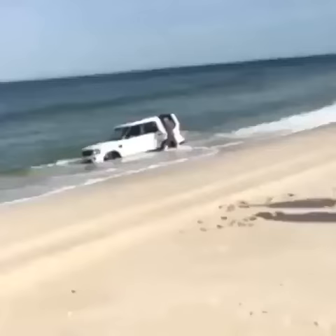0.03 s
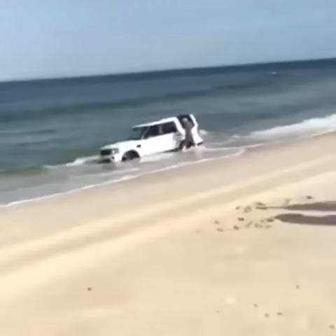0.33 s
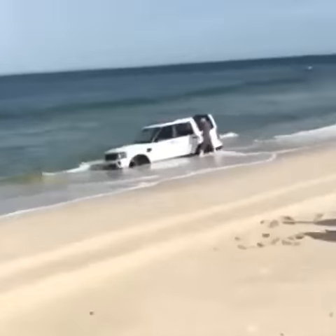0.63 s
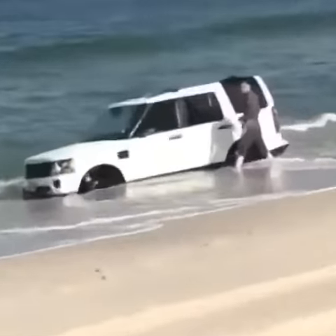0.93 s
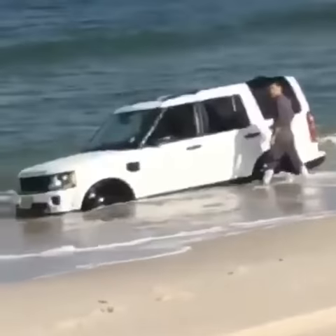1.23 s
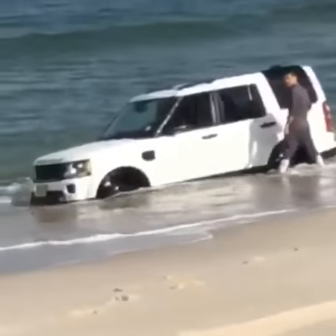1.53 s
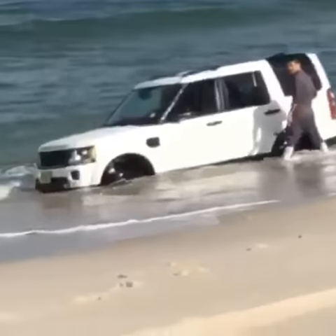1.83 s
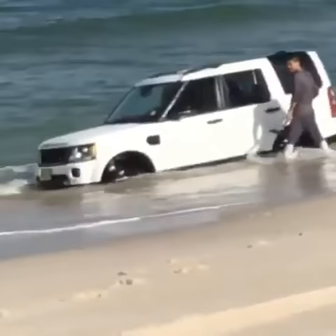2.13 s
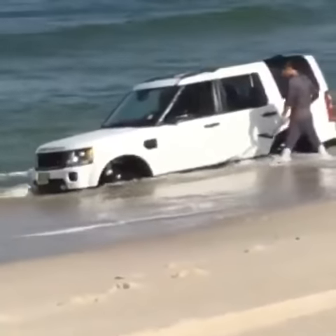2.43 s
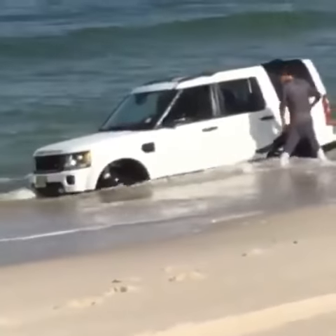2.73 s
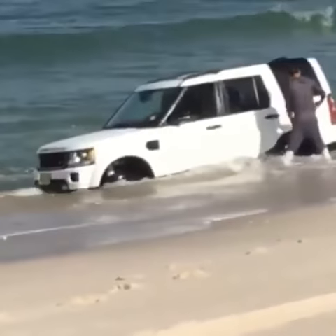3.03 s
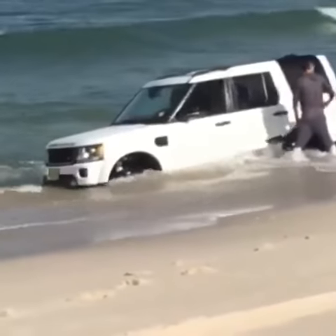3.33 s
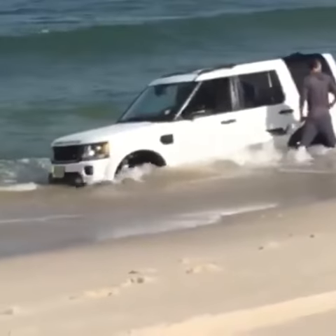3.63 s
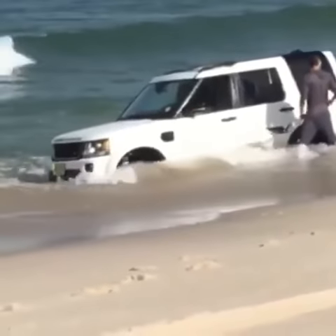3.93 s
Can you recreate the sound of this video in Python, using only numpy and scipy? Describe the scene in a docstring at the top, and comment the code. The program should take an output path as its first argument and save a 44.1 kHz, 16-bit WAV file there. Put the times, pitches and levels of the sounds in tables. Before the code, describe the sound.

Small surf washing up a sandy beach, with wind rumbling on the microphone.

```python
"""Small surf around a stuck car

After a short silence, wind rumbles and thumps on the microphone over a low drone and distant surf.
A wave builds up the sandy beach: tumbling water roars and bubbles, and foam fizzes as it spreads.
There is one small tick, and wavelets tip over in pattering splashes. Heard in mono from up the beach."""
import sys
import numpy as np
from scipy import signal
from scipy.fft import rfft, irfft
from scipy.io import wavfile
from scipy.ndimage import uniform_filter1d

SR = 44100
rng = np.random.default_rng(int(sys.argv[2]) if len(sys.argv) > 2 else 0)


def store_pcm(level_fs):
    """Save levels as 16-bit WAV."""
    pcm = np.round(np.clip(level_fs, -1, 1) * 32767).astype(np.int16)
    wavfile.write(sys.argv[1], SR, np.atleast_2d(pcm).T)


N = 176400


def undb(db):
    """Decibels to gain."""
    return 10 ** (np.asarray(db) / 20)


def unit(x):
    """Scale to rms 1."""
    return x / np.sqrt(np.mean(x ** 2) + 1e-20)


def curve(rows):
    """Join (time_s, value) rows by straight lines."""
    return np.interp(np.arange(N) / SR, *np.array(rows).T)


def wander(rate_hz):
    """Smoothed random steps, rate_hz of them a second; rms 1."""
    hold = max(int(SR / rate_hz), 2)
    steps = rng.standard_normal(1024)[np.arange(N) // hold % 1024]
    return unit(uniform_filter1d(uniform_filter1d(steps, hold), hold // 2))


def bin_hz():
    """Frequency of each spectral bin."""
    return np.maximum(np.arange(N // 2 + 1) * SR / N, 1)


def equalise(x, points):
    """Filter by (freq_hz, gain_db) points; rms 1."""
    hz, db = np.array(points).T
    gain = undb(np.interp(np.log(bin_hz()), np.log(hz), db))
    return unit(irfft(rfft(x) * gain, N))


def band(x, hz, octaves):
    """Keep a bell-shaped band; rms 1."""
    bell = np.exp(-.5 * (np.log2(bin_hz() / hz) / octaves) ** 2)
    return unit(irfft(rfft(x) * bell, N))


def swell(peak_s, half_length_s):
    """A bell-shaped fade in and out."""
    return np.exp(-((np.arange(N) / SR - peak_s) / half_length_s) ** 2)


def churn(rate_hz, own_db, shared_db, bands=24):
    """White noise whose bands flicker, partly alone and partly together; rms 1."""
    spectrum, out = rfft(rng.standard_normal(N)), 0
    place = np.interp(np.log(bin_hz()), np.log([400, 14000]), [0, bands - 1])
    for k in range(bands):
        strip = irfft(spectrum * np.maximum(1 - abs(place - k), 0), N)
        out = out + strip * undb(own_db * wander(rate_hz))
    return unit(out * undb(shared_db * wander(rate_hz / 2)))


# Tone of the wind rumble: freq_hz, gain_db
WIND_EQ = [(15, -23), (28, -46), (52, -8.5), (73, -5), (108, -1), (128, -3), (145, -10), (190, -12),
           (228, -15), (256, -8.5), (295, -16.5), (340, -23), (500, -36.5), (1500, -49)]
# Fader ride on the rumble: time_s, level_db
WIND_FADER = [(.26, -38.5), (.48, -38.5), (.56, -36), (1.3, -36), (1.5, -35.8), (1.9, -35.9), (2.25, -35),
              (2.7, -36.5), (3.4, -35.5), (4, -35.5)]


def wind(buffet_db=1, buffet_hz=22):
    """Wind buffets the microphone with a hollow, unsteady rumble."""
    rumble = equalise(rng.standard_normal(N), WIND_EQ)
    return rumble * undb(curve(WIND_FADER) + buffet_db * wander(buffet_hz))


# Partials of the drone: pitch_hz, width_hz, level_db
DRONE_PARTIALS = [(38.9, 2.06, -44), (158, 7, -46.5)]


def drone(waver_db=2):
    """A low wavering drone, perhaps an engine idling."""
    out = 0
    for hz, width_hz, db in DRONE_PARTIALS:
        amplitude = np.sqrt(2) * undb(db + waver_db * wander(6))
        pitch_hz = hz + width_hz / 2 * wander(2 * width_hz)
        out = out + amplitude * np.sin(2 * np.pi * np.cumsum(pitch_hz) / SR)
    return out


# Tone of the distant wash: freq_hz, gain_db
WASH_EQ = [(200, -1), (320, 0.5), (500, -1), (750, -2.5), (950, 2.5), (1180, -4), (1500, -15.5),
           (2000, -19), (2500, -15.5), (3700, -15), (5000, -22), (13000, -36)]
# Hollow resonances in the wash: centre_hz, width_octaves, base_level_db
HOLLOW_BANDS = [(1170, 0.022, -62.5), (1900, 0.03, -63), (2071, 0.031, -59.5)]
# Fader ride on those resonances: time_s, gain_db
HOLLOW_FADER = [(.26, -7), (.47, -7), (.54, 1), (1.0, 1.2), (1.55, -0.5), (1.8, 3), (4, 1)]


def distant_surf(wash_db=-49, flicker_db=1, flicker_hz=40):
    """Surf further along the shore: a steady wash with a few flickering hollow resonances."""
    wash = equalise(churn(rate_hz=24, own_db=2, shared_db=1.1), WASH_EQ)
    hollows = 0
    for hz, octaves, db in HOLLOW_BANDS:
        ring = band(rng.standard_normal(N), hz, octaves)
        hollows = hollows + undb(db) * unit(ring * undb(flicker_db * wander(flicker_hz)))
    return undb(wash_db) * wash + hollows * undb(curve(HOLLOW_FADER))


def bubbles(per_s=240, low_hz=592.7, high_hz=3860, decay_cycles=19.7, glide=.0827, spread_db=2.5):
    """Bubbles caught in tumbling water: short rings that rise in pitch; rms 1."""
    out = np.zeros(N + SR)
    for when, pitch, softness in rng.random((3000, 3))[:int(per_s * N / SR)]:
        hz = low_hz * (high_hz / low_hz) ** pitch
        decay_samples = decay_cycles * SR / hz
        age = np.arange(int(4 * decay_samples)) / decay_samples  # in decay times
        ring = np.sin(2 * np.pi * decay_cycles * age * (1 + glide * age / 2)) * np.exp(-age)
        start = int(when * N)
        out[start:start + len(age)] += ring * undb(-spread_db * np.log(max(softness, .02)))
    return unit(out[:N])


# Tone of the wave's roar: freq_hz, gain_db
ROAR_EQ = [(150, 1), (300, -1), (450, 2), (750, -1.5), (1000, -4), (1220, -3.5), (1340, -5.5), (1450, -3),
           (1600, -8), (1720, -3), (2150, -6.5), (2350, -8.5), (3800, -8.5), (4800, -18), (13000, -40)]
# Fader ride on roar and bubbles together: time_s, gain_db
WAVE_FADER = [(.26, -51), (.5, -50), (.8, -46.5), (1.05, -47.5), (1.6, -49), (1.95, -47), (2.5, -45),
              (3, -44), (3.5, -43.2), (3.7, -42.5), (4, -44)]


def incoming_wave(roar_db=1.5, bubble_db=-8):
    """Tumbling water roars and bubbles, louder as the wave comes in."""
    roar = equalise(churn(rate_hz=32, own_db=2.6, shared_db=1), ROAR_EQ)
    return (undb(roar_db) * roar + undb(bubble_db) * bubbles()) * undb(curve(WAVE_FADER))


# Tone of the fizz: freq_hz, gain_db
FOAM_EQ = [(500, -15), (1400, -3), (2200, 3.5), (2650, -1.5), (3300, 2), (4050, 2.5), (4800, 0), (6100, 3),
           (7500, 1.3), (9500, 0.5), (12500, -2), (14000, -6)]
# Fader ride on the fizz: time_s, gain_db
FOAM_FADER = [(.26, -55), (.45, -53), (.64, -51), (.79, -48.5), (.92, -50.5), (1.2, -50.5), (1.52, -53),
              (1.7, -51), (1.97, -50), (2.07, -47), (2.34, -45.5), (2.55, -46), (3, -46), (3.6, -44.5),
              (4, -44)]


def foam(trim_db=2, pops_per_s=2500, pop_db=-6, spread_db=4):
    """Foam spreads over the sand: a hiss with countless tiny pops."""
    hiss = churn(rate_hz=36, own_db=2, shared_db=.43)
    sizes = undb(spread_db * np.minimum(rng.exponential(size=N), 4))
    polarity = np.sign(rng.standard_normal(N))
    pops = unit(sizes * polarity * (rng.random(N) < pops_per_s / SR))
    return equalise(hiss + undb(pop_db) * pops, FOAM_EQ) * undb(trim_db + curve(FOAM_FADER))


# Gust thumps: peak_s, half_length_s, level_db, pitch_hz
GUST_HITS = [(.31, 0.0067, -29.5, 95.3), (0.578, 0.072, -34, 120), (0.673, 0.04, -33.5, 85),
             (0.91, 0.042, -33, 65), (1.157, 0.0087, -26.5, 91.4), (1.287, 0.015, -26, 105),
             (1.384, 0.01, -32.5, 100.3), (1.684, 0.012, -31.5, 100), (1.78, 0.013, -28.5, 100),
             (1.833, 0.011, -26.5, 109), (2.13, 0.06, -38, 105.8), (2.489, 0.017, -29, 91.8),
             (2.584, 0.017, -29.5, 96.3), (2.88, 0.025, -28.5, 99.7), (3.159, 0.011, -26.5, 104.4),
             (3.409, 0.012, -31.5, 99.5), (3.558, 0.019, -30, 106)]


def gusts(wobble=.1018):
    """Each gust swings the pressure at the microphone for a few uneven cycles."""
    warped_s = np.cumsum(1 + wobble * wander(80)) / SR
    out = 0
    for peak_s, half_length_s, db, hz in GUST_HITS:
        swing = np.sqrt(2) * np.sin(2 * np.pi * hz * warped_s)
        out = out + undb(db) * swing * swell(peak_s, half_length_s)
    return out


# Ringing modes of the tick: pitch_hz, decay_s, level_db
TICK_RINGS = [(4600, .0005, -33), (5800, .0005, -33.5), (2600, .0016, -39), (1400, .002, -41),
              (9300, .001, -42)]


def tick(start_s=.3536):
    """One small dry tick close by: a few rings that die almost at once."""
    age_s = np.maximum(np.arange(N) / SR - start_s, 0)
    return sum(undb(db) * np.sin(2 * np.pi * hz * age_s) * np.exp(-age_s / decay_s)
               for hz, decay_s, db in TICK_RINGS)


# Splash cues: peak_s, half_length_s, level_db, centre_hz, width_octaves
SPLASH_HITS = [(0.539, .022, -50.5, 2000, .7), (0.78, 0.019, -47.5, 3100, 0.65),
               (2.06, 0.037, -48, 3000, 0.54), (2.279, 0.015, -49, 3500, .5),
               (2.37, 0.027, -43.5, 3700, .7), (2.72, 0.016, -42.5, 2850, .5),
               (3.476, 0.022, -46, 3500, .6), (3.525, 0.018, -43.5, 1960, 0.25),
               (3.685, 0.034, -42.5, 1090, 0.55), (3.767, .014, -47, 2900, .4),
               (3.92, 0.065, -43, 1450, .5)]


def splashes(drops_per_s=1200):
    """Wavelets tip over: each throws a brief patter of drops."""
    drops = np.sign(rng.standard_normal(N)) * (rng.random(N) < drops_per_s / SR)
    return sum(undb(db) * band(drops, hz, octaves) * swell(peak_s, half_length_s)
               for peak_s, half_length_s, db, hz, octaves in SPLASH_HITS)


def scene():
    """The whole beach, the same in both ears."""
    water = distant_surf() + incoming_wave() + foam() + splashes()
    return np.tile(water + wind() + gusts() + drone() + tick(), (2, 1))


def record(dry, start_s=.259, top_hz=13700):
    """The sound cuts in after a short silence; a steep low-pass takes off the top."""
    live = np.arange(N) / SR >= start_s
    low_pass = signal.ellip(10, .2, 80, top_hz, fs=SR, output="sos")
    return signal.sosfilt(low_pass, dry * live)


dry = scene()
out = record(dry)
store_pcm(out)
```